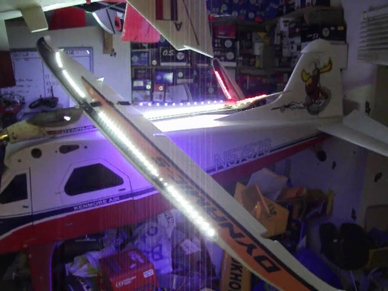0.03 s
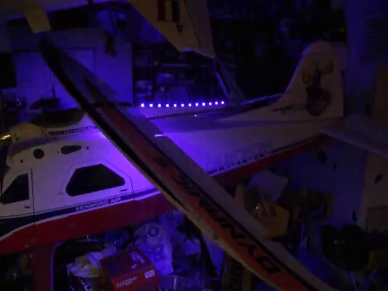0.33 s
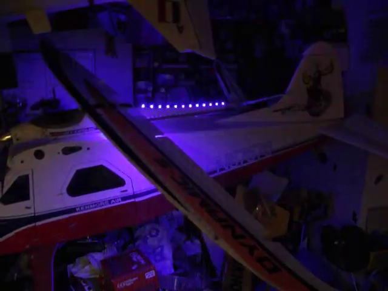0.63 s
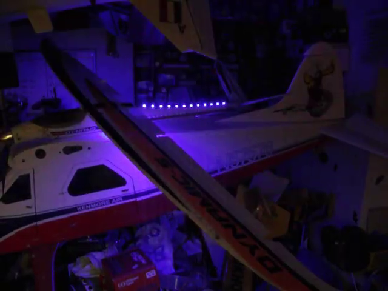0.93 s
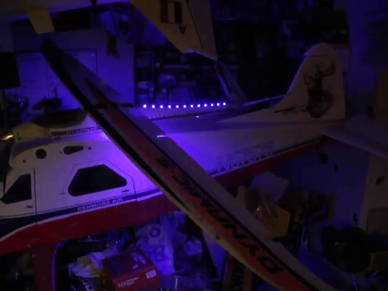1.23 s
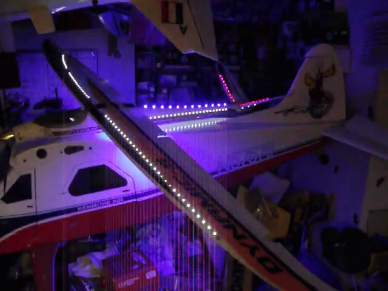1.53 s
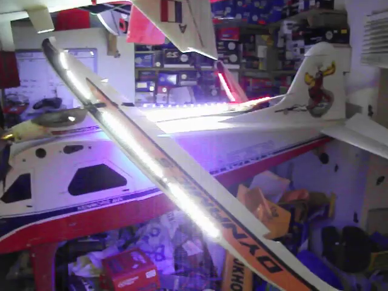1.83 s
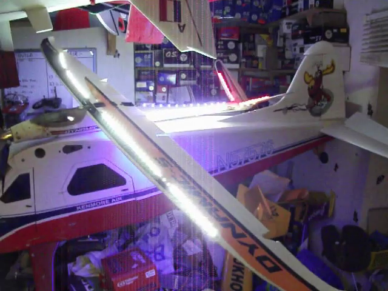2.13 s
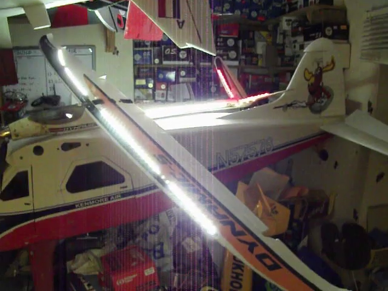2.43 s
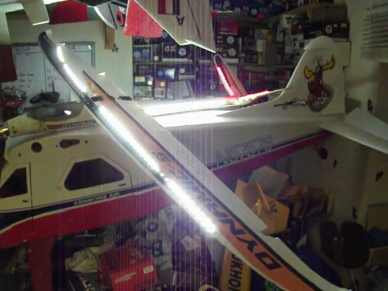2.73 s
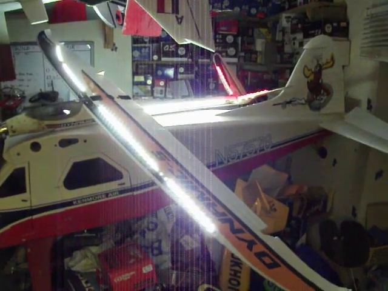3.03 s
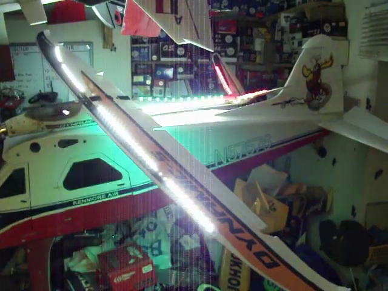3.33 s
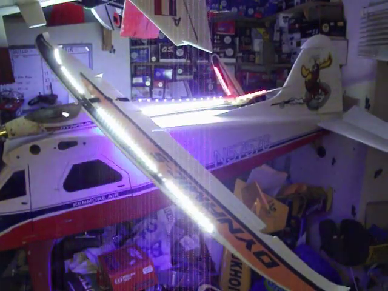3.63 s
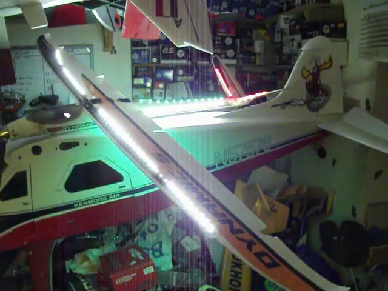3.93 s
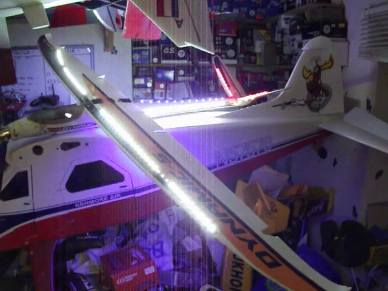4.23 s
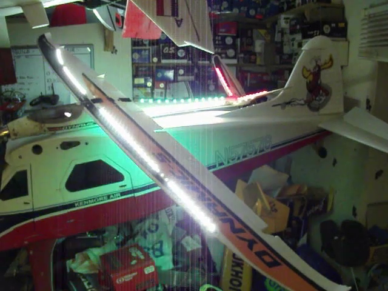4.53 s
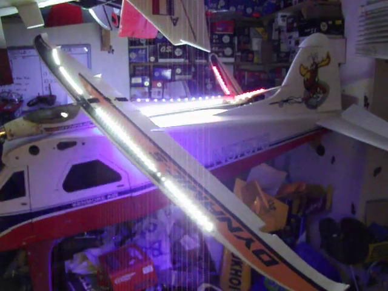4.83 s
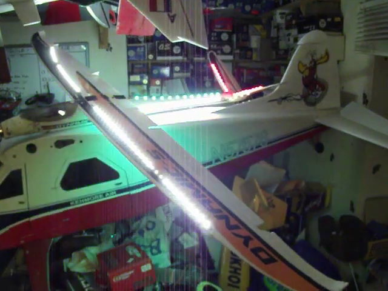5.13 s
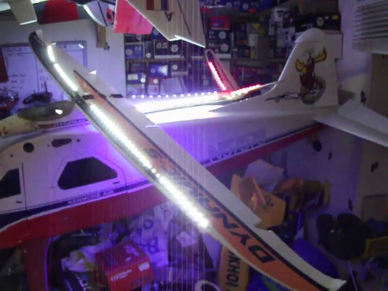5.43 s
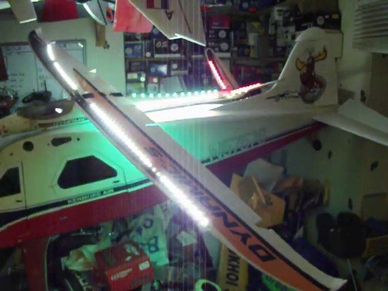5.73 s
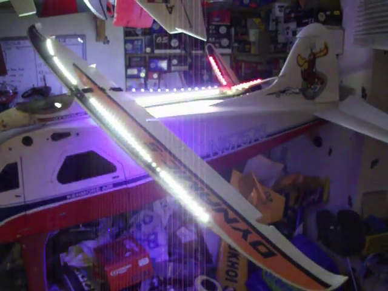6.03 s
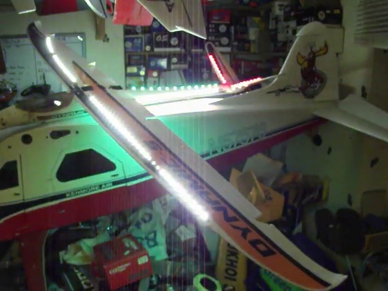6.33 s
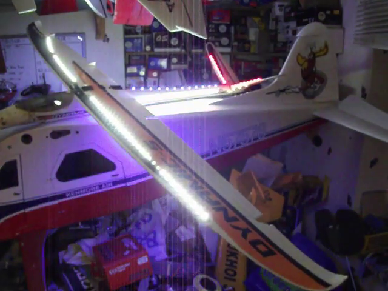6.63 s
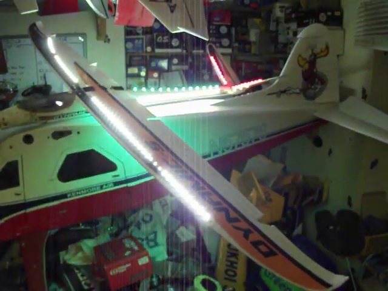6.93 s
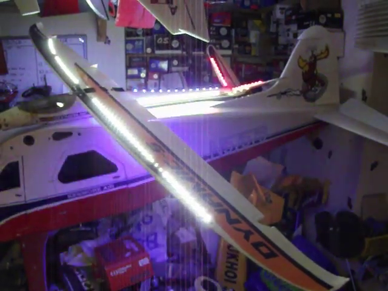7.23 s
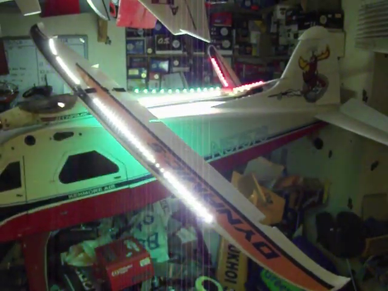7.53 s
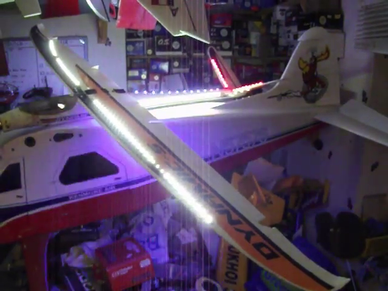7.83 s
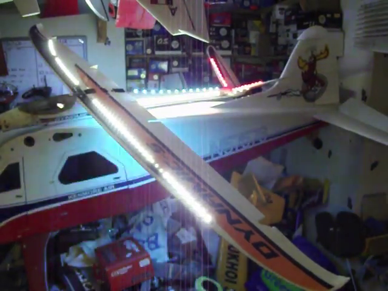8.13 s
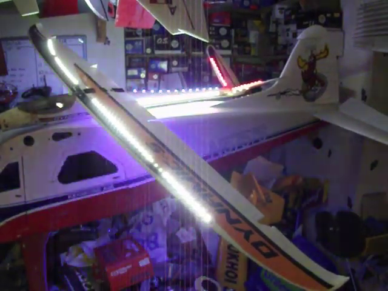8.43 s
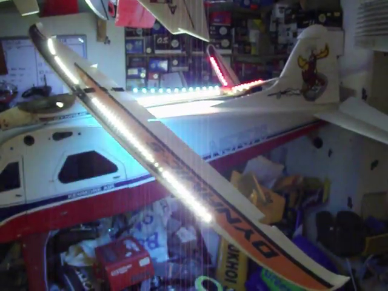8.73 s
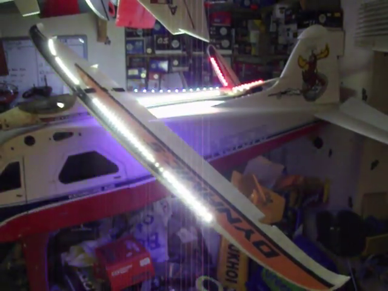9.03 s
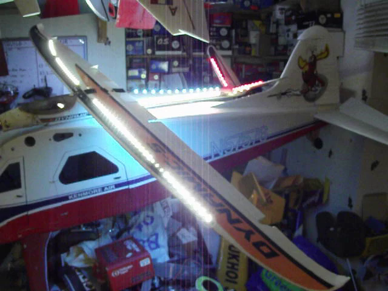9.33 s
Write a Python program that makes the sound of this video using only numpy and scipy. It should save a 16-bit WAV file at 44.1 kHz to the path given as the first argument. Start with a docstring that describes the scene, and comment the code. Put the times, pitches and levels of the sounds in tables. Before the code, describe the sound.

A low machine hum with a faint buzz fills a quiet workshop from the start. It sags around 1 second, recovers by 2, then weakens and is gone at about 7 seconds. Something like a small fan keeps up a fluttering whirr throughout, over steady hiss. Light switches snap at about 0.1, 1.4, 2.3 and 3.3 seconds, the second the loudest; each is a sharp click with a brief ring of the housing and a dry knock from the panel. A notched wheel turns in short runs of soft ticks from 0.4 to 1.1 seconds, from 4.2 to 4.7, from 8.3 to 8.8 and again just after 9. Two faint, dull bumps fall near 2 and 8.5 seconds. The room sounds small and dry, heard through a hissy, narrow-band microphone with little top end.

```python
"""A low machine hum sags, recovers and dies away in a quiet workshop, while something like a small fan
keeps up a fluttering whirr of air noise. Light switches snap four times: each lever rings its housing
and knocks the panel behind it. A notched wheel turns in short runs of soft ticks as its spring slips
and seats, and there are two faint, dull bumps. A small, hissy, narrow-band microphone hears it all."""
import sys
import numpy as np
from scipy import signal
from scipy.fft import rfft, irfft, next_fast_len
from scipy.io import wavfile
from scipy.ndimage import uniform_filter1d

SR = 44100
rng = np.random.default_rng(int(sys.argv[2]) if len(sys.argv) > 2 else 0)


def wav_out(sig):
    """Save sig, one row per channel (or a flat mono array), as 16-bit PCM at SR to the path in sys.argv[1]."""
    wavfile.write(sys.argv[1], SR, np.round(np.clip(np.atleast_2d(sig).T, -1, 1) * 32767).astype(np.int16))


N = 413658
TIME = np.arange(N) / SR
TAPS = 8192  # samples in a room response
BINS = np.fft.rfftfreq(TAPS, 1 / SR)


def gain_of(db):
    """Decibels to amplitude."""
    return 10 ** (np.asarray(db) / 20)


def unit_rms(x):
    """Scales to an rms of 1."""
    return x / np.sqrt(np.mean(x ** 2) + 1e-20)


def eq_gain(curve, hz):
    """Gain at hz from (Hz, dB) points on a log-frequency axis."""
    curve_hz, db = np.transpose(curve)
    return gain_of(np.interp(np.log(hz + 1), np.log(np.sort(curve_hz) + 1), db))


def envelope(points):
    """Gain over time from (seconds, dB) points."""
    return gain_of(np.interp(TIME, *np.transpose(points)))


def add(mix, start, sound):
    """Mixes a sound in at start seconds."""
    part = mix[round(start * SR):][:len(sound)]
    part += sound[:len(part)]


def equalise(x, curve):
    """Filters x by an EQ curve of (Hz, dB) points."""
    size = next_fast_len(N + TAPS)
    hz = np.fft.rfftfreq(size, 1 / SR)
    return irfft(rfft(x, size) * eq_gain(curve, hz), size)[:N]


def noise(curve):
    """Noise of rms 1, coloured by an EQ curve."""
    return unit_rms(equalise(rng.standard_normal(N), curve))


def wander(rate_hz):
    """Smooth random movement of rms 1, up to about rate_hz."""
    t = np.arange(0, N / SR + 1, .002)
    hz = np.fft.rfftfreq(len(t), t[1])
    white = rfft(rng.standard_normal(len(t)))
    slow = irfft(white / np.hypot(1, (hz / rate_hz) ** 2), len(t))
    return unit_rms(np.interp(TIME, t, slow))


def resonances(modes):
    """Power spectrum of steep-sided peaks, each given as (Hz, width in Hz, dB)."""
    return sum((gain_of(db) / (1 + ((BINS - hz) / width) ** 2)) ** 2 for hz, width, db in modes)


def struck(power):
    """The ring of a struck body: the minimum-phase impulse with this power spectrum's shape."""
    log_gain = np.log(power + 1e-10) / 2
    mirrored = np.concatenate([log_gain, log_gain[-2:0:-1]])
    ring = np.fft.ifft(np.exp(np.conj(signal.hilbert(mirrored)))).real
    return ring[:TAPS // 2] * SR / 10000


def scatter(delay, t60):
    """Dense reflections of energy 1 that begin after delay seconds and fall 60 dB in t60 seconds."""
    t = np.arange(TAPS) / SR
    fade = gain_of(-60 * t / t60)
    spectrum = rfft(rng.standard_normal(TAPS) * fade, 2 * TAPS)
    spectrum /= np.sqrt(uniform_filter1d(abs(spectrum) ** 2, size=48))  # evens out the colour
    tail = np.concatenate([np.zeros(round(delay * SR)), irfft(spectrum)])[:TAPS]
    return tail / np.linalg.norm(tail)


def in_room(ring, clutter_db, clutter_t60, room_db, room_t60):
    """The direct ring, its first echoes, quick scatter from small things, then the room's tail."""
    # First echoes off the bench and nearby clutter. Each row: delay in seconds, level in dB.
    echoes = [(.0012, -5), (.0043, -7), (.0071, -8), (.0113, -8)]
    paths = gain_of(clutter_db) * scatter(.002, clutter_t60)
    paths += gain_of(room_db) * scatter(.008, room_t60)
    paths[0] += 1
    for delay, db in echoes:
        paths[round(delay * SR)] += gain_of(db)
    return signal.fftconvolve(ring, paths)


def machine_hum(pitch_hz=65.3):
    """A nearly pure low tone with a wavering buzz of overtones; both fade away."""
    # Fades of the fundamental and of the buzz. Each row: time in seconds, level in dB.
    fundamental_fade = [(0.0, -25), (0.3, -25.5), (0.95, -32), (2.03, -28), (2.88, -29.5), (3.27, -32),
                        (5.43, -33), (6.57, -39.5), (7.05, -63)]
    buzz_fade = [(0, -48), (.5, -51.5), (1.03, -51.5), (1.12, -57), (2.55, -57.5), (3.1, -61.5), (5.3, -61),
                 (7, -73.5)]
    # The buzz's overtones. Each row: multiple of the pitch, level in dB relative to the buzz's fade.
    overtones = [(1.5, -9), (2, -.5), (3, -14), (3.79, -10), (4.5, -7), (5, -3), (5.25, -11), (6, -15)]
    phase = 2 * np.pi * np.cumsum(pitch_hz + .06 * wander(1.3)) / SR
    buzz = np.zeros(N)
    for multiple, db in overtones:
        gain = gain_of(db + wander(3))
        buzz += gain * np.sin(multiple * phase + .25 * wander(2) + 2 * np.pi * rng.random())
    fade_out = np.clip((7.3 - TIME) / 0.25, 0, 1)
    fundamental = envelope(fundamental_fade) * np.sin(phase)
    return np.sqrt(2) * fade_out * (fundamental + envelope(buzz_fade) * buzz)


def thin_tones():
    """Two faint, steady tones, one low and one high, wavering slightly in phase."""
    # Each row: pitch in Hz, rms level in dB.
    tones = [(247.3, -70.5), (4513, -70.5)]
    sines = (gain_of(db) * np.sin(2 * np.pi * hz * TIME + 0.54 * wander(2.9)) for hz, db in tones)
    return np.sqrt(2) * sum(sines)


def fan(whirr_trim_db=-3.5, rush_db=-43, flutter_db=2.0, rush_flutter_db=0.64, surge_db=1.5):
    """Two bands of air noise share one uneven flutter; the lower flutters more deeply and also surges."""
    # Colours of the lower whirr and the upper rush. Each row: frequency in Hz, relative level in dB.
    whirr_eq = [(1050, -35.5), (1240, -16), (1330, -20), (1420, -9), (1500, -7.5), (1565, -22), (1630, 0),
                (1700, 0), (1830, -8), (1970, -12.5), (2080, -14), (2300, -33.5)]
    rush_eq = [(2150, -18.5), (2350, -10.5), (2480, -3.5), (2590, 0), (2680, 0), (2750, -4), (2820, -2),
               (2930, -8), (3050, -17.5), (3300, -28.5)]
    # The whirr's slow drift. Each row: time in seconds, level in dB before the trim.
    drift = [(0, -39), (2.75, -39), (3.85, -37), (5.2, -38), (7.8, -38.5), (8.3, -36.5), (9.38, -37.5)]
    flutter = unit_rms(np.tanh(wander(rate_hz=20)))
    surge = unit_rms(np.tanh(wander(rate_hz=7)))
    whirr_gain = envelope(drift) * gain_of(whirr_trim_db + surge_db * surge + flutter_db * flutter)
    whirr = whirr_gain * noise(whirr_eq)
    rush = gain_of(rush_db + rush_flutter_db * flutter + .5 * wander(25)) * noise(rush_eq)
    return whirr + rush


def room_tone(level_db=-45.5):
    """A steady bed of room rumble and microphone hiss."""
    # The bed's colour. Each row: frequency in Hz, relative level in dB.
    bed_eq = [(10, 19), (35, 10.5), (70, 8.5), (130, 5.5), (300, 0.5), (600, -2), (1000, -4.5),
              (2200, -2.5), (3300, -2.5), (4500, -4.5), (6000, -6)]
    return gain_of(level_db) * noise(bed_eq)


def switches(knock_lag=0.00346, wall_lag=.0071, ring_width_hz=100, body_width_hz=140):
    """Each snap rings the housing in its own colour; the panel answers a moment later with a dry knock."""
    # Contacts, light as the lever starts and loud as it lands. Each row: start in seconds, gain in dB,
    # then Hz and dB for each of ring, body and knock, edge in dB, highest Hz that the contact excites.
    snaps = [(0.1063, -22, 2880, 13, 1700, 14, 435, -6, -17, 3500),
             (0.1146, 0, 2914, 14.5, 2040, -2, 433, 0, -4, 3480),
             (1.0968, -21, 2450, 9, 2100, 4, 800, -1, -1, 3500),
             (1.4155, -7, 2800, 0, 2050, -3, 430, -17, 2, 4000),
             (1.4182, 3.5, 3105, 10, 1990, 9.5, 404, 1, -13, 4300),
             (2.246, -18, 2480, 8, 2300, 7, 550, -17, 0, 3900),
             (2.2864, -3.5, 2640, 4, 1820, 4.5, 860, -4.5, -8, 3200),
             (3.269, -10, 2760, 6, 2250, -8, 520, 0.5, 13.5, 3900),
             (3.3169, -13.5, 3120, 9, 2100, -6, 550, -22, 16.5, 3500),
             (3.32, -4, 2760, 9, 1580, 6, 847, 3, -3, 3430)]
    # Modes of the housing and of the panel that carries it. Each row: pitch in Hz, width in Hz, gain in dB.
    housing_modes = [(730, 510, -13), (1283, 90, -5), (1620, 210, -26), (1895, 84, 1.5), (2130, 130, 0.5),
                     (2420, 390, -2), (2830, 193, 6.5), (2930, 220, -2.5), (3320, 90, -6), (3690, 210, -5),
                     (3980, 150, -20.5)]
    panel_modes = [(339, 45, -1.5), (542, 66, -0.5), (716, 19, -9.5), (845, 33, -4.5), (1060, 54, -12)]
    # The contact's dry edge. Each row: frequency in Hz, gain in dB.
    edge_eq = [(150, -63), (400, -30.5), (2500, -30.5), (3700, -21), (4100, -23), (5200, -31),
               (6000, -40.5)]
    out = np.zeros(N)
    for start, db, ring_hz, ring_db, body_hz, body_db, knock_hz, knock_db, edge_db, top_hz in snaps:
        own_modes = [(ring_hz, ring_width_hz, ring_db), (body_hz, body_width_hz, body_db)]
        housing = resonances(housing_modes + own_modes)
        contact = 1 / (1 + (BINS / top_hz) ** 20)
        edge = (gain_of(edge_db) * eq_gain(edge_eq, BINS)) ** 2
        ring = gain_of(db) * struck(housing * contact + edge)
        add(out, start, in_room(ring, clutter_db=-3, clutter_t60=.04, room_db=-2, room_t60=.145))
        # The knock's long waves pass small clutter by and return only from the wall and the room.
        knock = gain_of(db + knock_db) * struck(resonances(panel_modes + [(knock_hz, 55, 3)]))
        knock_tail = signal.fftconvolve(knock, scatter(wall_lag, t60=0.095))
        add(out, start + knock_lag, knock)
        add(out, start + knock_lag + wall_lag, gain_of(-5) * knock)
        add(out, start + knock_lag, gain_of(-3) * knock_tail)
    return out


def notched_wheel(slip_db=-2.5, seat_db=-0.5, seat_lag=0.0048, knock_db=11, knock_lag=.002):
    """At each notch the spring slips and then seats, with a low knock from the bench under it."""
    # Turns of the wheel. Each row: start in seconds, notches passed, time stretch, gain in dB,
    # low knock in dB.
    turns = [(.391, 6, .985, 0.5, -2.5), (.887, 3, .7, -1, 2), (1.112, 1, 1, -3, -14),
             (4.225, 6, 0.99, -1, 1), (8.329, 6, 0.98, -0.5, 1), (9.07, 4, 1, -0.5, 0)]
    # Every turn passes the same notches, a little faster as it goes.
    # Each row: delay in seconds before the stretch, gain in dB, low knock in dB, spring ring in dB.
    notches = [(0, -16.5, 3, 1), (.101, -19.5, 0.5, 3), (.195, -19, 0, 4.5), (.274, -20, 3.5, -2),
               (.363, -19, 4.5, 1.5), (.439, -20, 3.5, 0)]
    # Modes of the wheel's housing. Each row: pitch in Hz, width in Hz, gain in dB.
    housing_modes = [(834, 130, -10.5), (1073, 70, 2.5), (1250, 86, -2), (1470, 73, -3.5), (1900, 130, -5),
                     (2685, 186, 6)]
    out = np.zeros(N)
    bench = struck(resonances([(322, 30, 0)]))
    for start, count, stretch, turn_db, turn_low_db in turns:
        for delay, notch_db, low_db, spring_db in notches[:round(count)]:
            onset = start + stretch * delay
            db = turn_db + notch_db
            tick = struck(resonances(housing_modes + [(2240, 190, spring_db)]))
            for lag, contact_db in [(0, slip_db), (seat_lag, seat_db)]:
                wet_tick = in_room(tick, clutter_db=1, clutter_t60=0.025, room_db=-6.5, room_t60=.09)
                add(out, onset + lag, gain_of(db + contact_db) * wet_tick)
            add(out, onset + knock_lag, gain_of(db + knock_db + turn_low_db + low_db) * bench)
    return out


def bumps():
    """Dull, faint knocks on one low resonance."""
    # Each row: start in seconds, gain in dB.
    hits = [(1.983, -14), (8.459, -18)]
    out = np.zeros(N)
    for start, db in hits:
        thud = gain_of(db) * struck(resonances([(520, 130, 0)]))
        add(out, start, in_room(thud, clutter_db=1.5, clutter_t60=.06, room_db=-6, room_t60=.12))
    return out


def scene():
    """All sources at the microphone, in mono."""
    beds = machine_hum() + thin_tones() + fan() + room_tone()
    return (beds + switches() + notched_wheel() + bumps())[None]


def record(dry):
    """A narrow microphone band, a small steady offset, and a ceiling that clips the hardest snap."""
    # The microphone's response. Each row: frequency in Hz, gain in dB.
    mic_eq = [(4700, 0.5), (5200, -2), (5500, -5.5), (5750, -13.5), (5950, -21), (6150, -32), (6350, -88.5)]
    offset, ceiling, top_hz = .0256, .71, 16000
    narrow = equalise(dry[0], mic_eq)
    clipped = np.clip(narrow + offset, -ceiling, ceiling)
    lowpass = signal.butter(12, top_hz, fs=SR, output="sos")
    return signal.sosfiltfilt(lowpass, clipped)[None]


dry = scene()
out = record(dry)
wav_out(out)
```